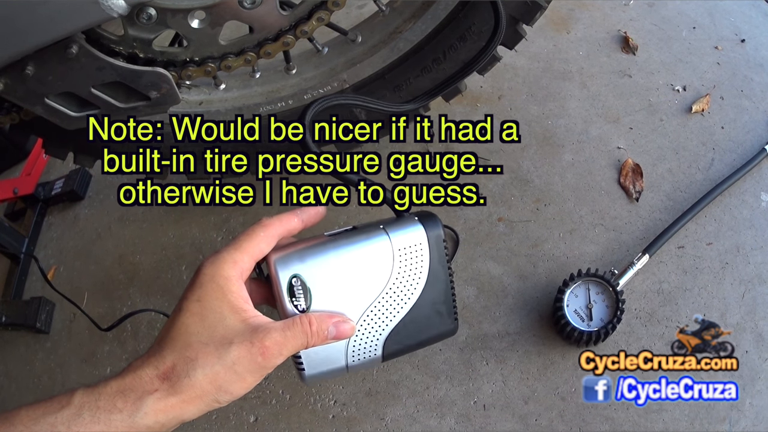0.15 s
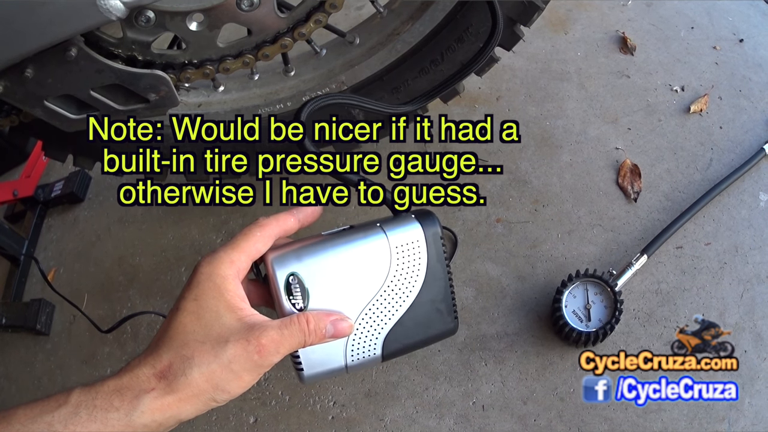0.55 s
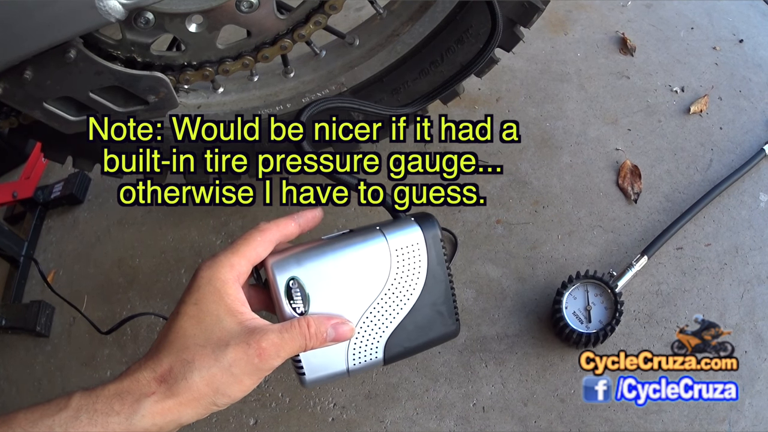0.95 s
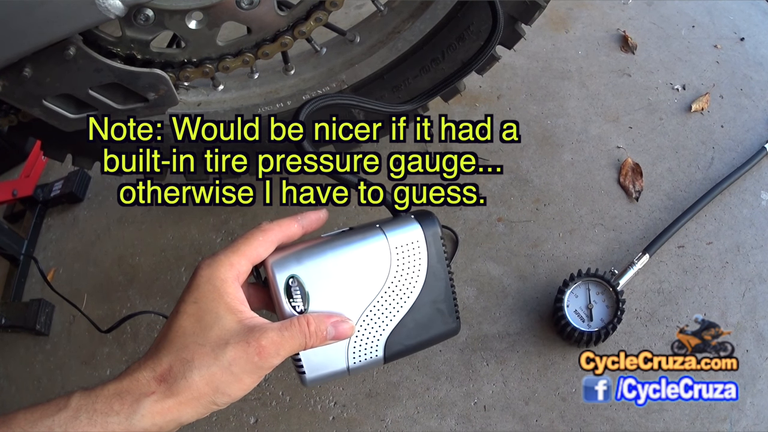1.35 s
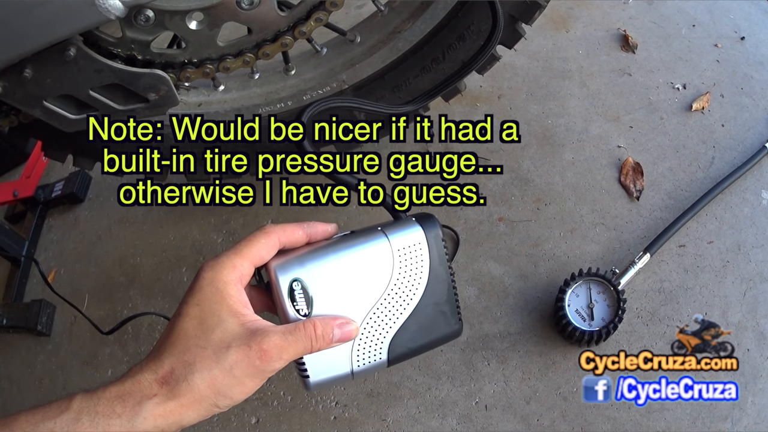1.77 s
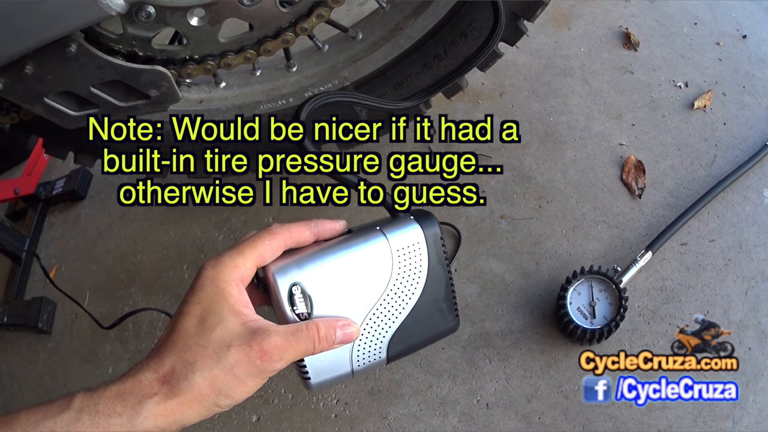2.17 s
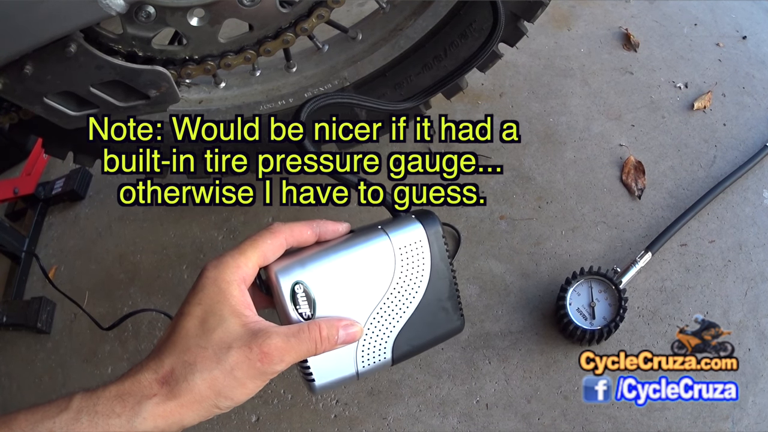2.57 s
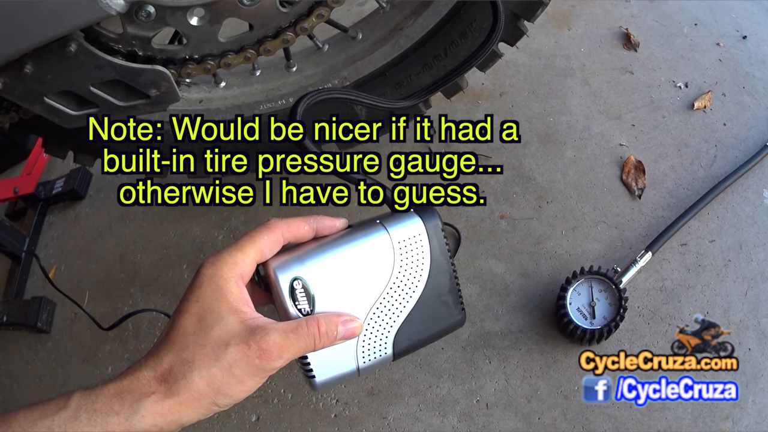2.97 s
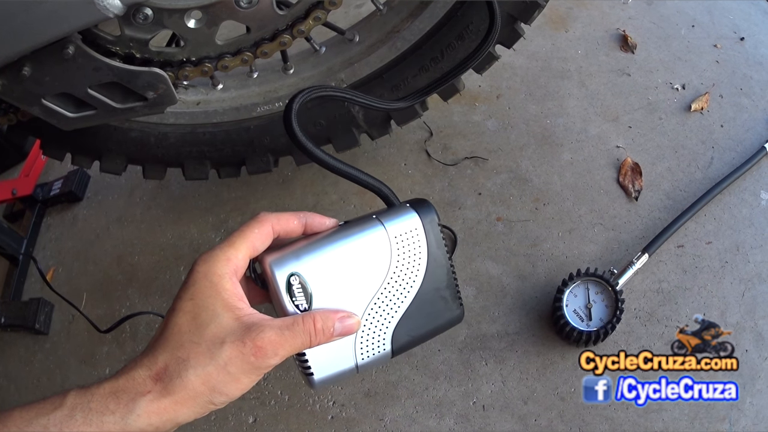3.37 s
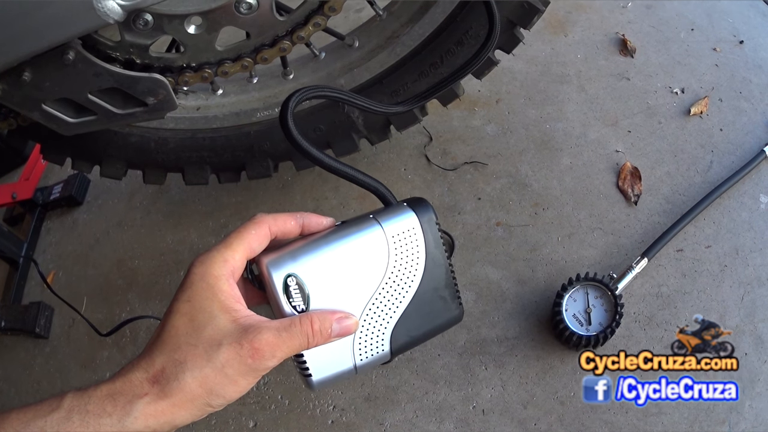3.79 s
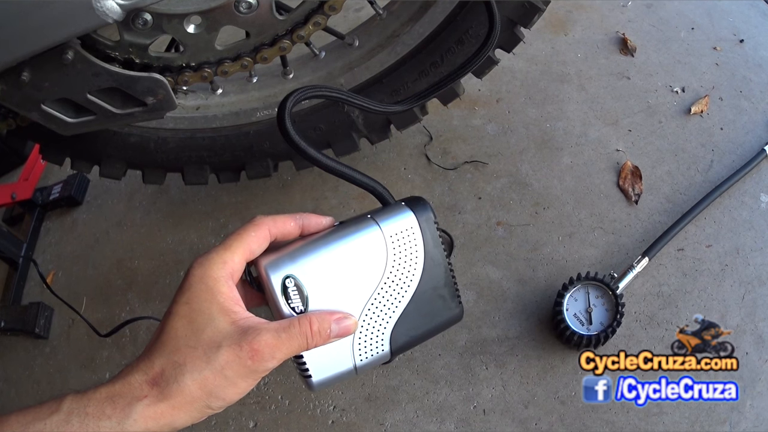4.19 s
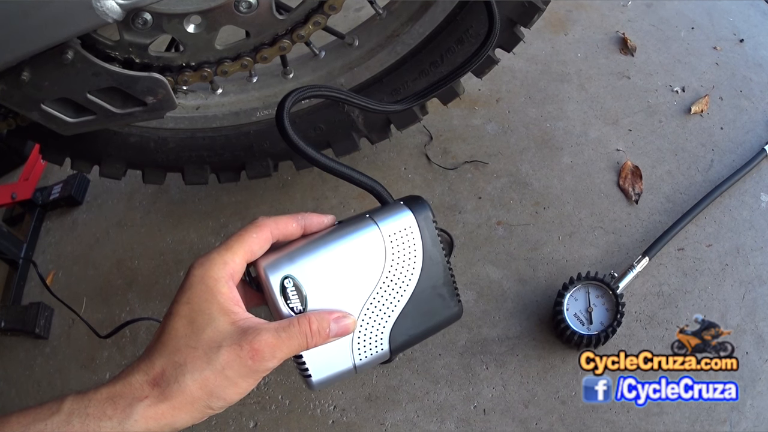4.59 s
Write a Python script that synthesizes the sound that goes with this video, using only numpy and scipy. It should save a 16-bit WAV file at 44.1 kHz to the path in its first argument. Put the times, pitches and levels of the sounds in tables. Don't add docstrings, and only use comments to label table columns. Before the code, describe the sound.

A small electric piston pump is already running and never stops, inflating a motorcycle tyre on concrete outdoors. Its roughly fifty knocks a second blur into a harsh, nasal buzz with gear rattle, ticking and hiss. Around one and a half seconds a hand presses the plastic casing and the ring shifts slightly, then shifts again as it settles. Close stereo microphone, mildly overloaded, with short reflections from the ground.

```python
import sys
import numpy as np
from scipy import signal
from scipy.fft import rfft, irfft, next_fast_len
from scipy.io import wavfile
from scipy.ndimage import map_coordinates

SR = 44100
rng = np.random.default_rng(int(sys.argv[2]) if len(sys.argv) > 2 else 0)


def put_to_file(sound):
    columns = np.atleast_2d(sound).T
    safe = np.clip(columns, -1, 1)
    whole_steps = np.round(safe * 32767)
    wavfile.write(sys.argv[1], SR, whole_steps.astype(np.int16))


def boost_factor(decibels):
    exponent = np.asarray(decibels, float) / 20
    return 10 ** exponent


N = 208945

# start_s, turns_per_s
CRANK_SPEED = [(0.0, 51.432), (0.22, 51.491), (0.28, 51.359), (1.51, 51.322), (1.8, 51.942), (1.91, 51.615),
               (2.23, 51.881), (2.38, 52.432), (2.66, 52.062), (3.06, 52.275), (3.33, 52.086),
               (3.8, 52.297), (3.86, 51.983), (4.15, 52.026), (4.53, 51.752), (4.74, 52.088)]
# start_s, grip (0 loose, 1 pressed, 2 settled)
HAND_GRIP = [
    (0, 0),
    (1.44, 0),
    (1.48, .6),
    (2.1, .65),
    (2.35, 1),
    (2.9, 1.05),
    (3.3, 1.3),
    (4.1, 2),
    (4.74, 2),
]
# crank_order, width_orders, loose_db, pressed_db, settled_db
KNOCK_RESONANCES = [(20.9, 1, -40, -31.5, -44), (22, .8, -35, -45, -34), (25, .8, -31, -37, -46),
                    (26.5, 1.6, -35, -41, -33), (30.4, 1.4, -39, -36, -35), (35, 7, -40.5, -44, -44.5),
                    (39.8, 1, -50, -33, -35), (42, .8, -37, -33, -43), (46, 6, -42, -45, -44),
                    (55, 10, -57, -52, -51)]
KNOCK_ORDERS = [k for k in range(20, 60) if k not in (23, 24)]
# crank_order, loose_db, pressed_db, settled_db
SHELL_RING = [(14, -40, -38, -42), (15, -35, -30, -32), (16, -31, -34, -28), (17, -26, -27, -27),
              (18, -27, -34, -28), (19, -47, -46, -47)]
# crank_order, loose_db, pressed_db, settled_db
HEAD_RING = [(23, -31, -26.5, -31), (24, -33, -33, -30)]
# pitch_hz, width_hz, level_db, firm_grip_change_db, load_depth_db
CASING_MODES = [(796, 166, -36, 0, -2), (866, 115, -34, 2.5, -8), (1218, 124, -27.5, -2.5, 10),
                (1368, 98, -35, 2, 9), (1578, 380, -40, 2.5, 1.5), (2046, 300, -34, 0.5, 4.5),
                (2208, 230, -33.5, 0, -1), (2864, 59, -51.5, 8, -5)]
# pitch_hz, width_hz, level_db, firm_grip_change_db, load_depth_db
FRAME_MODES = [(3420, 127, -36.5, 5.5, 2), (4174, 260, -33, 3.5, 0.5), (3850, 390, -34, 2, -4),
               (5080, 230, -32.5, 0, 2.5), (5535, 480, -28.5, -2.5, -1), (6210, 650, -31.5, 3.5, 2.5),
               (7707, 200, -34, 0.5, 2.5), (9290, 740, -29, -0.5, 2.5), (10360, 550, -32, 0, 2)]
LOAD_ANGLES = [.95, .95, .25, .2, .9, .38, .42, .4, .1, .55, .2, .03, .9, .5, .9, .9, .9]
# crank_order, loose_db, pressed_db, settled_db
MESH_WHINE = [(66, -45, -39, -40), (80, -41, -39, -38), (81, -36, -38, -40)]
# crank_order, loose_db, pressed_db, settled_db
PISTON_HUM = [(1, -61, -62.5, -59), (2, -49, -48, -48), (3, -53.5, -55, -49), (4, -50, -47.5, -52.5),
              (5, -45.5, -43, -41.5), (6, -45.5, -45.5, -44.5), (7, -44.5, -44, -45.5), (8, -70, -54, -84),
              (9, -60, -41, -44), (10, -46.5, -50, -48), (11, -43, -39.5, -48.5), (12, -47, -70, -43.5),
              (13, -43.5, -39.5, -37)]
# shaft_order, loose_db, pressed_db, settled_db
MOTOR_HUM = [(1, -55, -54, -56)]
# pitch_hz, width_hz, length_ms, level_db
LINKAGE_TICKS = [(5800, 5100, 0.36, -40.5), (8800, 7900, 0.14, -33.5), (8450, 2600, 0.29, -43),
                 (6240, 430, 0.25, -33), (6330, 640, 0.53, -41.5), (5480, 600, 0.74, -36),
                 (6200, 5400, 0.36, -35), (4154, 194, 0.99, -34.5), (4310, 50, 0.69, -45),
                 (3394, 250, 1., -38), (3473, 230, 0.37, -39), (5030, 350, 0.81, -41.5),
                 (4960, 790, 0.77, -40)]
TICK_ANGLES = [(.7, .6), (.98, .95), (.82, .77), (.45, .43), (.8, .8), (.79, .76), (.2, .2), (.47, .55),
               (.62, .6), (.3, .28), (.8, .79), (.93, .93), (.78, .76)]
# pitch_hz, density_db_per_hz
HISS_SPECTRUM = [(30, -36), (250, -17), (1000, -17), (2500, -14), (3000, -20.5), (4000, -5), (6700, -8.5),
                 (11200, -11.5)]
# pitch_hz, level_db
GROUND_ECHO = [(60, -24), (200, -7), (600, -11), (1200, -9.5), (2500, -5), (5400, -16.5), (11000, -22.5)]
# pitch_hz, density_db_per_hz
WIND_SPECTRUM = [(15, -6), (30, 0), (120, -7), (250, -1), (500, -21), (1000, -50)]
# pitch_hz, level_db
PORT_BALANCE = [(60, -.8), (130, -1.3), (270, -2), (570, -2.6), (1210, -3.5), (2550, -1.5), (5410, -2.5),
                (11400, 1.5)]
# pitch_hz, lead_rad
PORT_LEAD = [(0, 0), (950, -0.6), (1550, 0.1), (1810, -0.4), (3360, -0.0), (3960, -0.4), (5170, -0.0),
             (11600, 0.0)]


def evened(x):
    return x / np.sqrt(np.mean(x ** 2) + 1e-20)


def read(points, hz):
    f, value = np.transpose(points)
    return np.interp(np.log(hz + 1), np.log(f + 1), value)


def curve(rows):
    start_s, value = np.transpose(rows)
    return np.interp(np.arange(N) / SR, start_s, value)


def coloured(x, gain):
    size = next_fast_len(N)
    spectrum = rfft(x, size) * gain(np.fft.rfftfreq(size, 1 / SR))
    return irfft(spectrum, size)[..., :N]


def wander(hz):
    return evened(coloured(rng.standard_normal(N), lambda f: 1 / (1 + (f / hz) ** 4)))


def resonate(x, hz, width):
    r = np.exp(-np.pi * width / SR)
    pole = r * np.exp(2j * np.pi * hz / SR)
    return evened(signal.lfilter([1 - r], [1, -pole], x).real)


def orders(rows, turns, grip, uneven_db, uneven_hz, slip, delay=0):
    angle = turns + slip * wander(uneven_hz)
    swell_db = uneven_db * wander(uneven_hz)
    first = rows[0][0]
    out = np.zeros(N)
    for k, *grip_db in rows:
        level_db = np.interp(grip, range(3), grip_db) + swell_db + .5 * uneven_db * wander(1.6)
        phase = round(k) * angle - round(k - first) * delay
        out += boost_factor(level_db) * np.sqrt(2) * np.cos(2 * np.pi * phase)
    return out


def outlet_knock(turns, grip):
    table = np.array(KNOCK_RESONANCES)
    centre, width, level_db = table[:, :1], table[:, 1:2], table[:, 2:]
    power = [(boost_factor(2 * level_db) / (1 + (2 * (k - centre) / width) ** 4)).sum(0) for k in KNOCK_ORDERS]
    rows = np.column_stack([KNOCK_ORDERS, 10 * np.log10(power)])
    low = rows[:, 0] < 28
    knock_turn, lag_turns = .785, .013
    return (orders(rows[low], turns - knock_turn - lag_turns, grip, uneven_db=0.73, uneven_hz=25, slip=0.00036)
            + orders(rows[~low], turns - knock_turn, grip, uneven_db=0.2, uneven_hz=25, slip=0.00031))


def shell_ring(turns, grip):
    return orders(SHELL_RING, turns, grip, uneven_db=1.1, uneven_hz=25, slip=0.0006)


def head_ring(turns, grip):
    return orders(HEAD_RING, turns - .31, grip, uneven_db=1.5, uneven_hz=25.4, slip=0.0011, delay=.4 * grip)


def teeth(turns):
    count, repeat_share, slip_turns = 600, .68, .001
    worn = rng.standard_normal((8, count))
    angle = (turns + slip_turns * wander(31)) % 1
    wear = np.linspace(0, 7, N)
    again = map_coordinates(worn, [wear, angle * count], order=1, mode="grid-wrap")
    fresh = rng.standard_normal(N)
    return np.sqrt(repeat_share) * evened(again) + np.sqrt(1 - repeat_share) * fresh


def gear_rattle(turns, grip):
    firm = np.clip(grip, 0, 1)
    out = np.zeros(N)
    for (hz, width, db, firm_db, depth_db), angle in zip(CASING_MODES + FRAME_MODES, LOAD_ANGLES):
        impacts = teeth(turns) if hz > 3000 else rng.standard_normal(N)
        impacts = impacts * boost_factor(2.0 * wander(380))
        load_db = depth_db * np.cos(2 * np.pi * (turns - angle)) + 0.63 * wander(3.3)
        ring = resonate(impacts * boost_factor(load_db), hz, width)
        out += boost_factor(db + firm_db * firm) * resonate(ring, hz, 3.8 * width)
    return out


def gear_mesh(turns, grip):
    return orders(MESH_WHINE, turns - .55, grip, uneven_db=1.5, uneven_hz=20, slip=0.0011)


def piston_hum(turns, grip):
    touch = np.maximum(grip, np.minimum(1.5 * grip, 1))
    return orders(PISTON_HUM, turns - .795, touch, uneven_db=0.55, uneven_hz=4.3, slip=0.0008)


def motor_hum(turns, grip):
    gearing = 4.21
    return orders(MOTOR_HUM, turns * gearing, grip, uneven_db=1.5, uneven_hz=3.3, slip=.03)


def once_a_turn(turns, jitter_ms, spread_db):
    at = np.flatnonzero(np.diff(np.floor(turns)) > 0)
    chance = rng.standard_normal((len(at), 2))
    shift = np.round(chance[:, 0] * jitter_ms * SR / 1000).astype(int)
    out = np.zeros(N)
    out[np.clip(at + shift, 0, N - 1)] = boost_factor(spread_db * chance[:, 1])
    return out


def linkage_ticks(turns):
    out = np.zeros(N)
    for (hz, width, ms, db), (first, last) in zip(LINKAGE_TICKS, TICK_ANGLES):
        click = once_a_turn(turns - np.linspace(first, last, N), jitter_ms=.06, spread_db=1.3)
        fade = np.exp(-np.arange(300) / SR * 1000 / ms)
        scrape = signal.oaconvolve(click, fade)[:N] * teeth(turns)
        strike = .9 * evened(click) + .5 * evened(scrape)
        out += boost_factor(db) * resonate(resonate(strike, hz, width), hz, width)
    return out


def air_hiss(turns):
    breath_db = 1.5 * np.cos(2 * np.pi * (turns - .9)) + .5 * wander(40)
    air = rng.standard_normal(N) * boost_factor(breath_db)
    return boost_factor(-23) * evened(coloured(air, lambda f: boost_factor(read(HISS_SPECTRUM, f))))


def reflections(x):
    length, decay_s = 4000, 0.4
    sign = rng.choice([-1., 1.], length)
    present = rng.random(length) < .05
    taps = sign * present * boost_factor(-60 * np.arange(length) / SR / decay_s)
    tail = signal.fftconvolve(x, taps / np.linalg.norm(taps))[:N]
    return coloured(tail, lambda f: boost_factor(read(GROUND_ECHO, f))) * np.array([[1], [-1]])


def wind():
    noise = rng.standard_normal((2, N))
    return boost_factor(-59) * evened(coloured(noise, lambda f: boost_factor(read(WIND_SPECTRUM, f))))


def at_ports(x):
    side = np.array([[.5], [-.5]])
    return coloured(x, lambda f: boost_factor(side * read(PORT_BALANCE, f)) * np.exp(1j * side * read(PORT_LEAD, f)))


def scene():
    grip = curve(HAND_GRIP)
    turns = .115 + np.cumsum(curve(CRANK_SPEED)) / SR
    steady = outlet_knock(turns, grip) + shell_ring(turns, grip) + head_ring(turns, grip)
    steady += gear_mesh(turns, grip) + piston_hum(turns, grip) + motor_hum(turns, grip)
    rough = gear_rattle(turns, grip) + linkage_ticks(turns) + air_hiss(turns)
    return at_ports(steady + rough) + reflections(rough + boost_factor(-11) * steady) + wind()


def band_limit(x):
    return signal.sosfilt(signal.butter(12, 12050, fs=SR, output="sos"), x)


def record(dry):
    soft = 1.1 * np.tanh(dry / 1.1)
    edge_hz, slope_db_per_hz = 11005, -.5
    narrow = coloured(soft, lambda f: boost_factor(slope_db_per_hz * np.clip(f - edge_hz, 0, 240)))
    return band_limit(narrow)


dry = scene()
out = record(dry)
put_to_file(out)
```